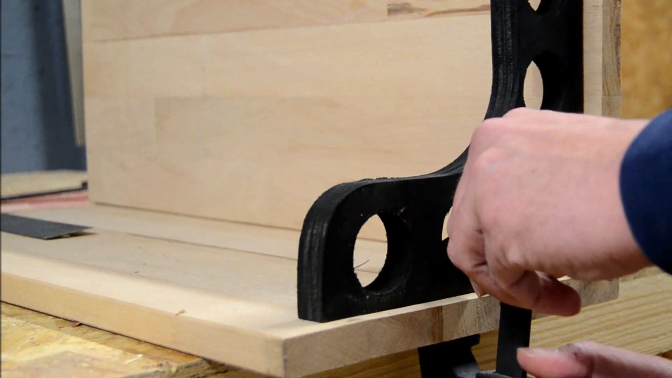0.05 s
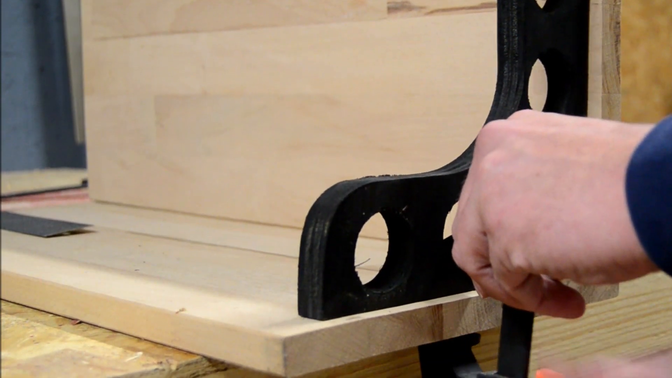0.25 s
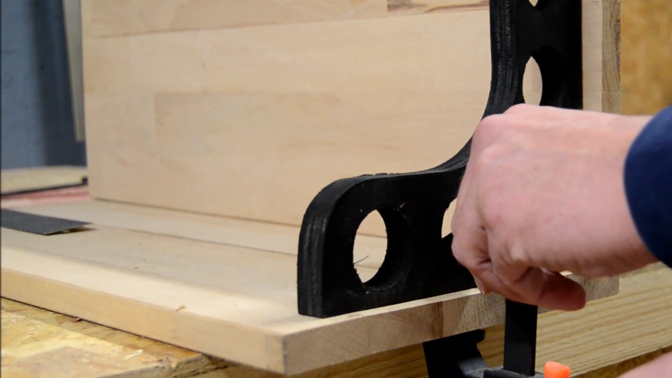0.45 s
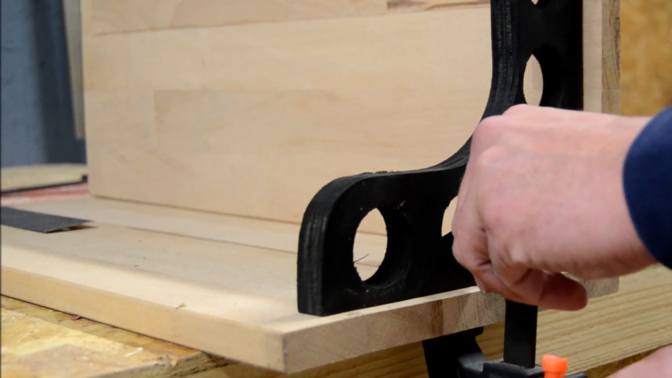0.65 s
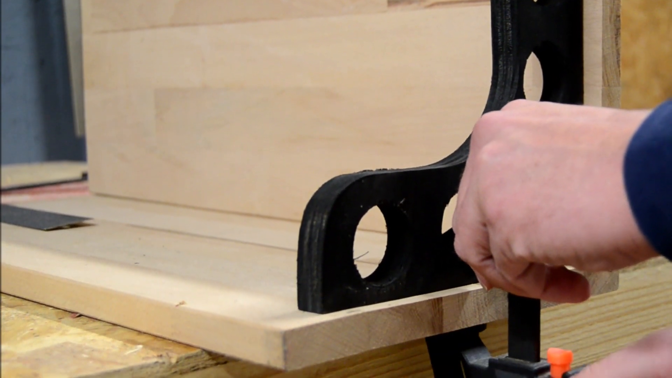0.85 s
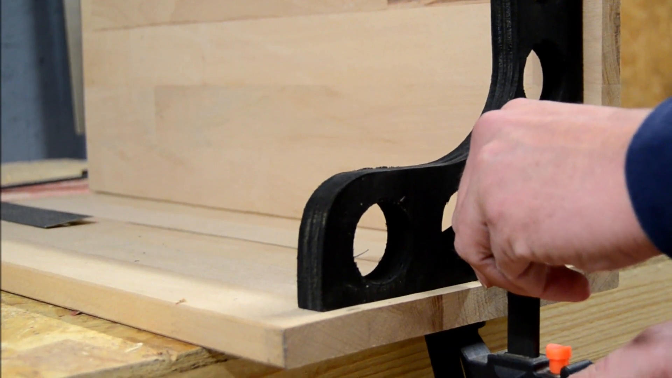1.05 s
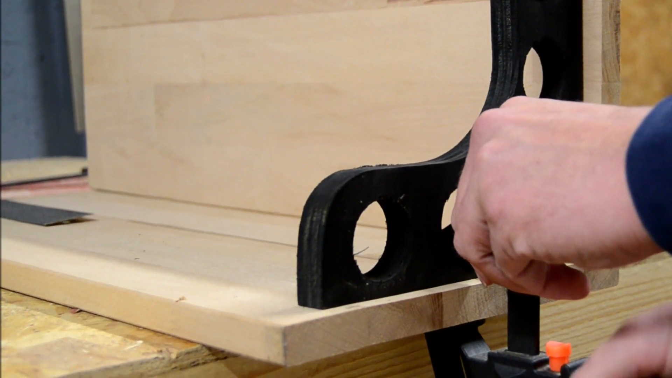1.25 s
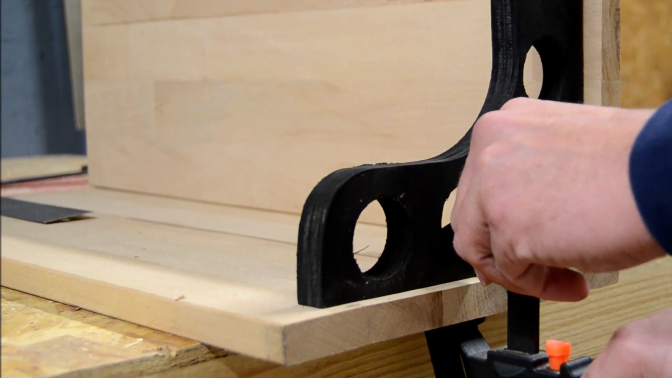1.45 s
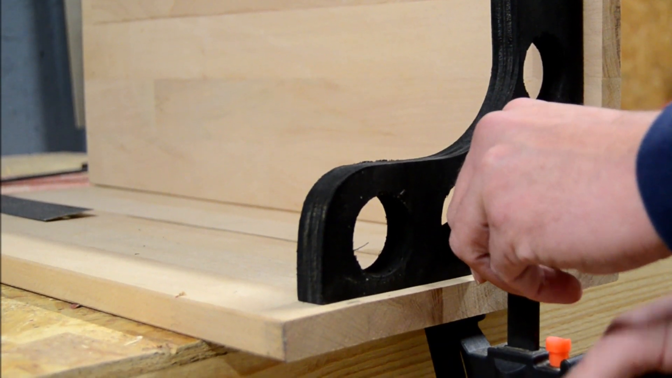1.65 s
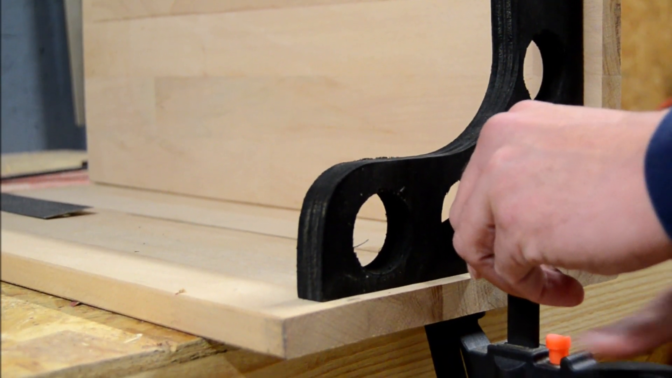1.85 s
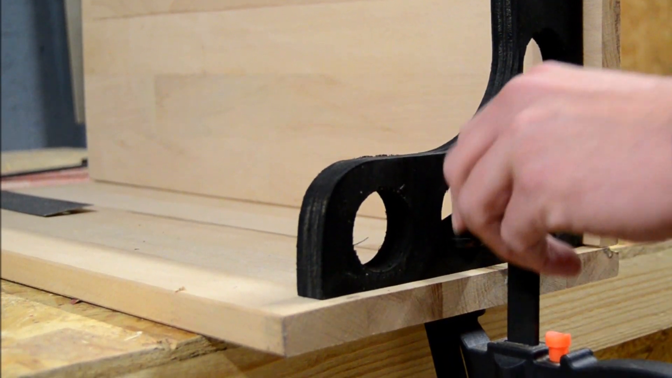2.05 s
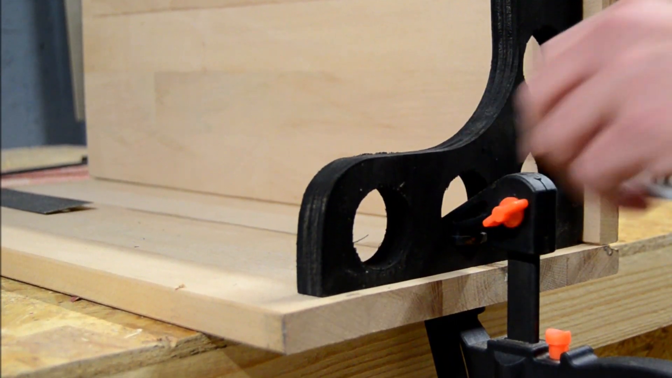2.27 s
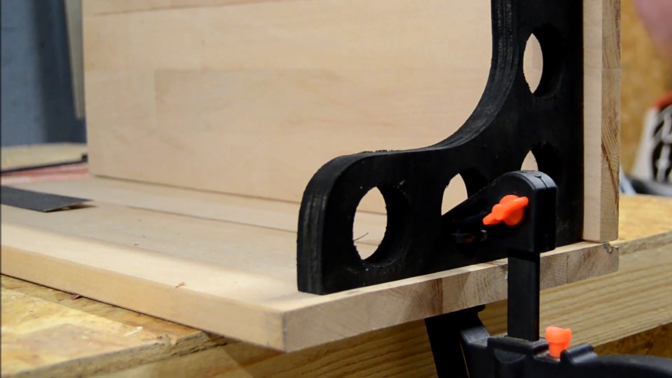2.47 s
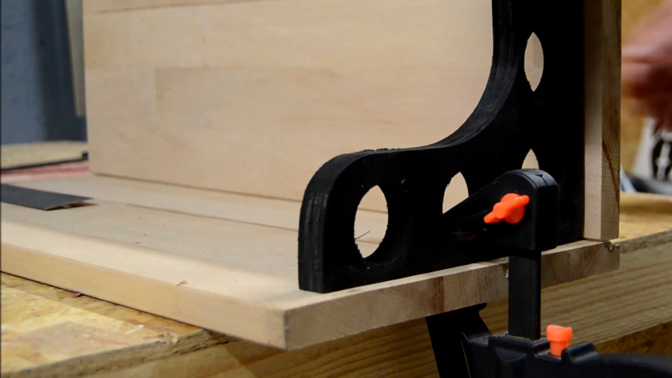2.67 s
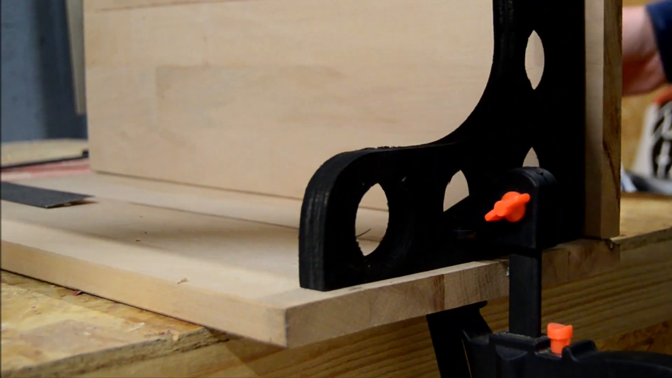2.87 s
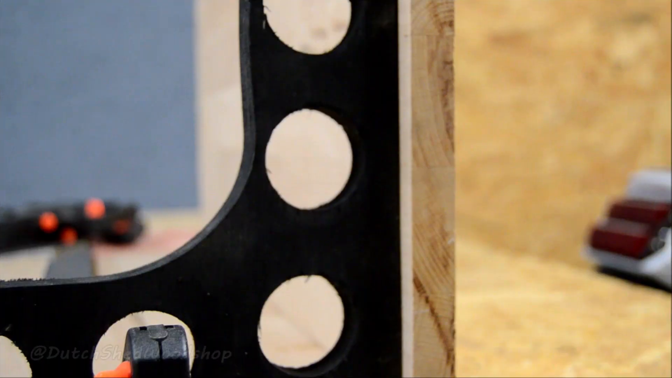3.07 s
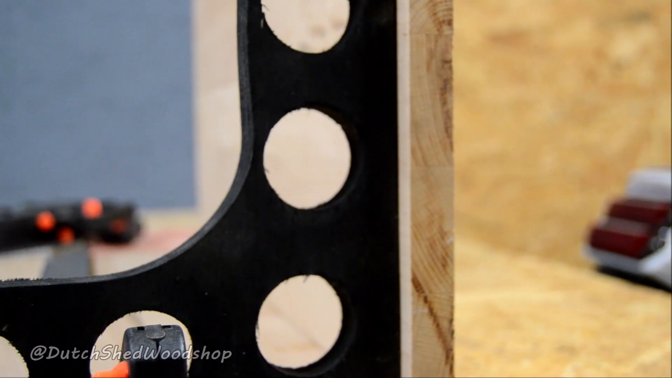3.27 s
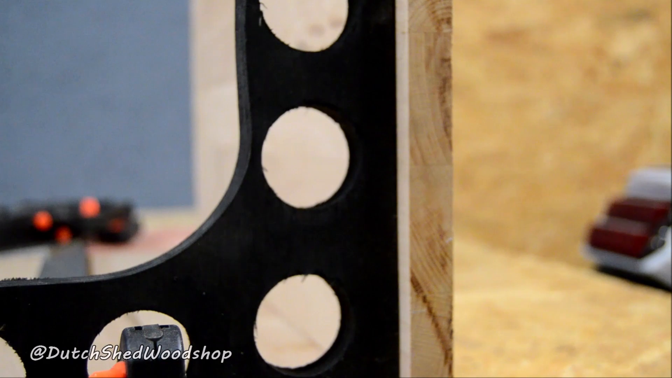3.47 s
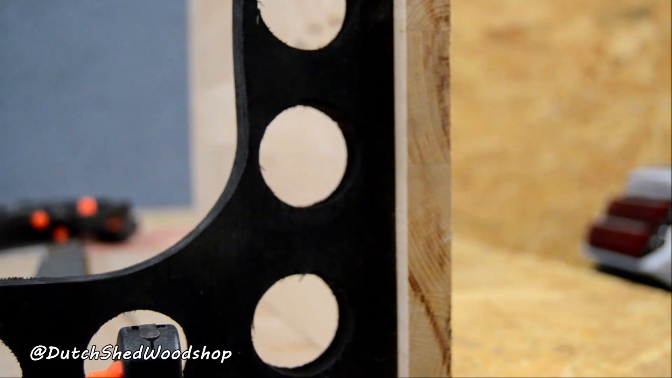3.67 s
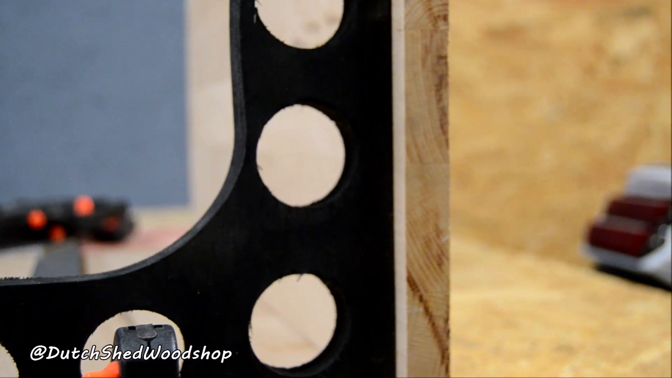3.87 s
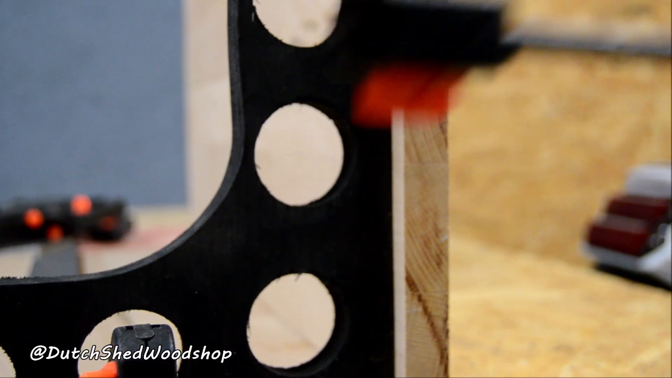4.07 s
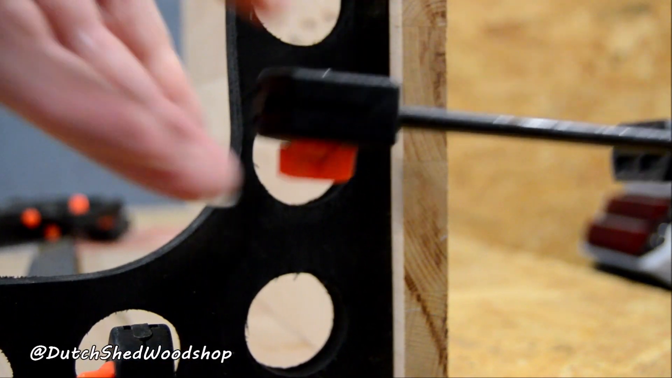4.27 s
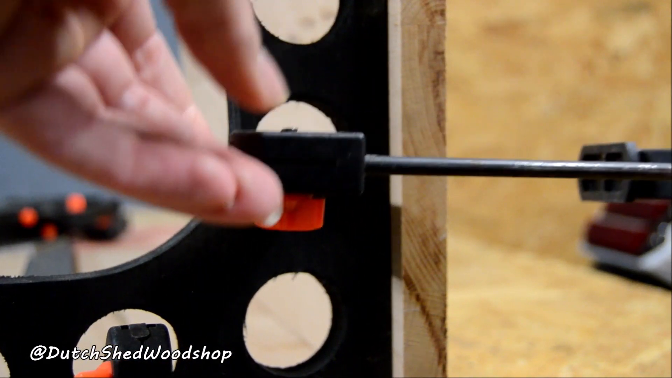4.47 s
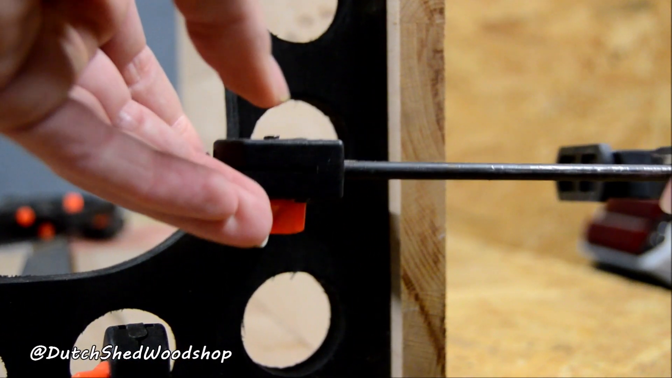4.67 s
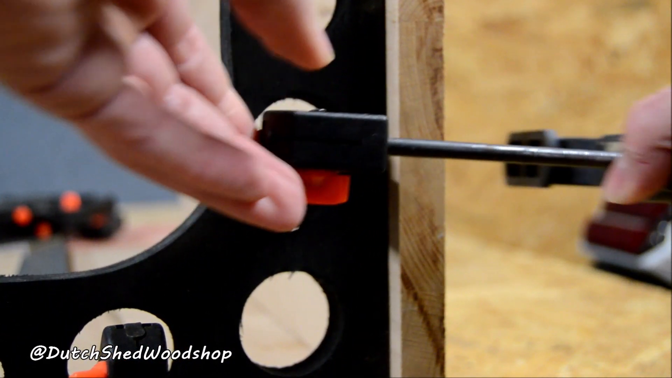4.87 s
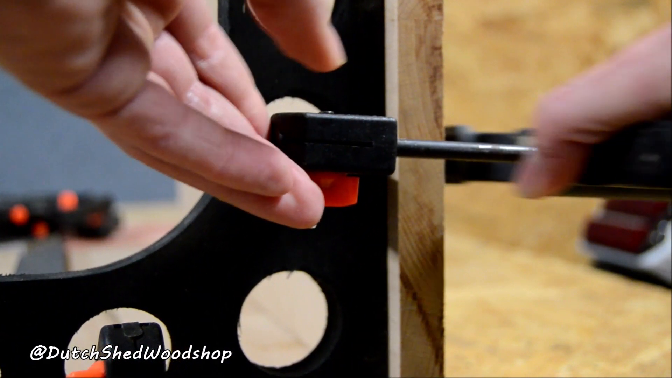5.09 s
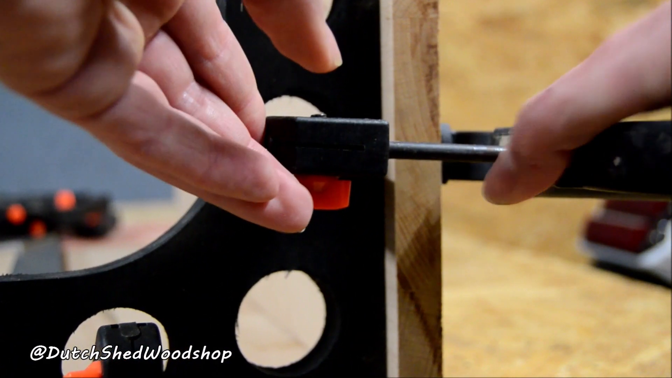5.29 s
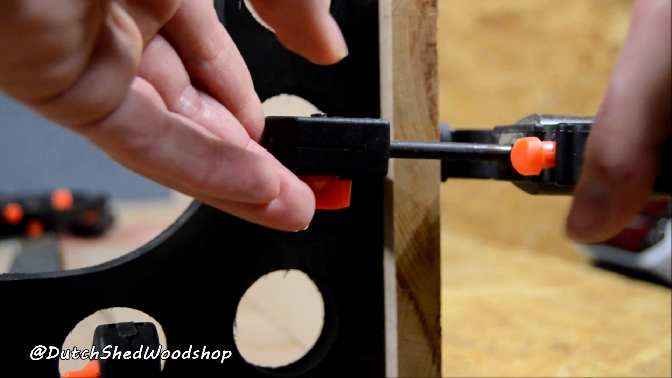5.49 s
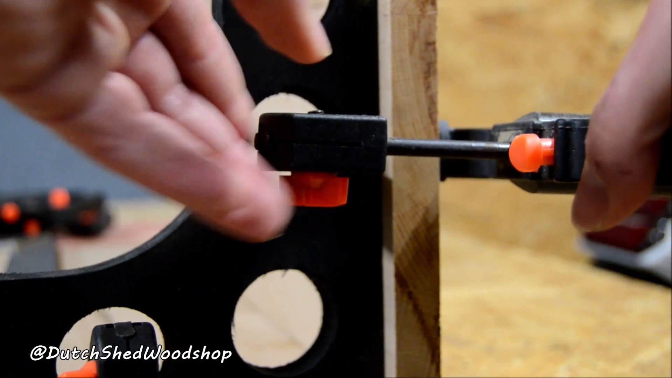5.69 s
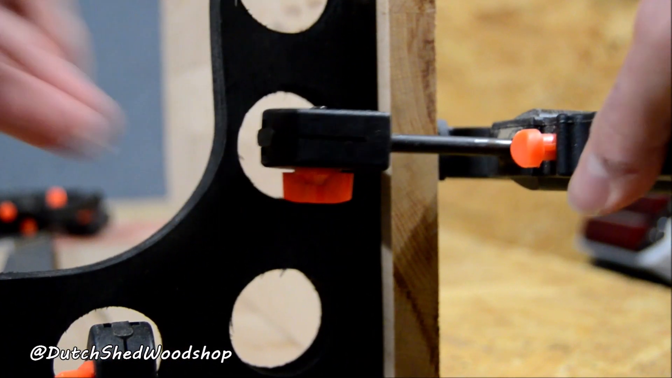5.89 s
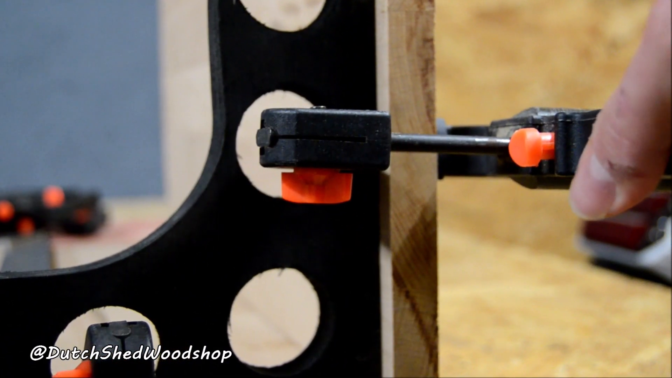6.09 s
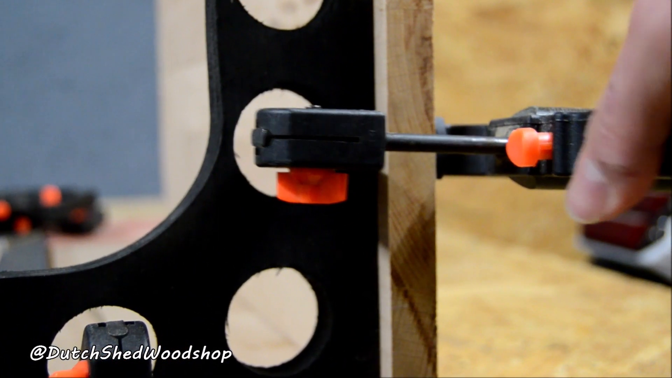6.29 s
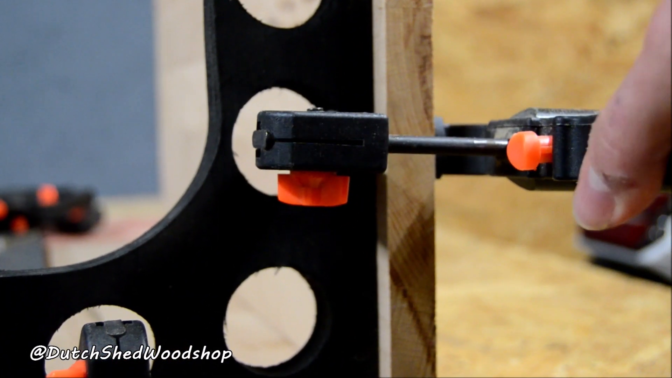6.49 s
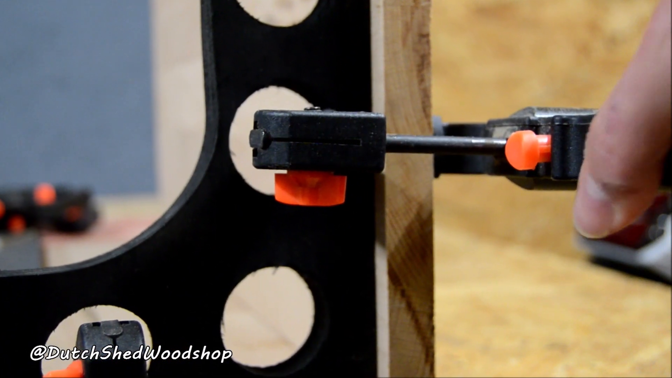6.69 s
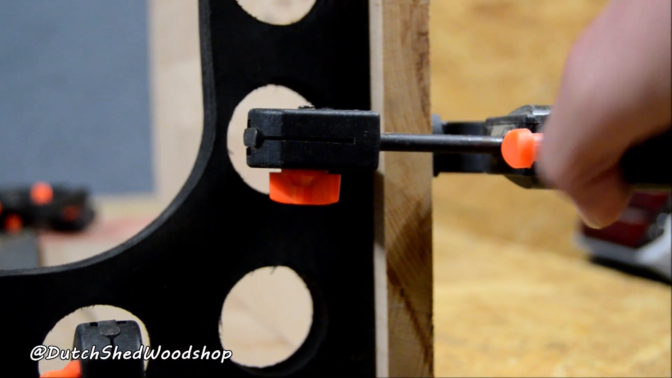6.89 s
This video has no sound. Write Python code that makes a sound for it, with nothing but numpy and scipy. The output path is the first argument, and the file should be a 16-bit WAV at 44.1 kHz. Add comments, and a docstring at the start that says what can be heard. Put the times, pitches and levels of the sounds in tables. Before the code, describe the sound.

Trigger clamps click and knock woodenly on boards in a small workshop; a clamp bar slides open with a rasp, then scrapes shut and tightens.

```python
"""Bar clamps in a small workshop

Two one-handed bar clamps fix a plastic square to a wooden jig, over faint air noise and hum.
Each squeeze or release of a trigger is a noise burst that knocks through the boards and rings on in the room.
Light ticks of the catch, spring pings and soft bench bumps go with the knocks; hands brush the jig.
The second clamp's bar slides open, then shut against the fence: random slips ring jaw and bar and hiss,
scrape, rumble and at moments groan."""
import sys
import numpy as np
from scipy import signal
from scipy.fft import rfft, irfft, next_fast_len
from scipy.io import wavfile
from scipy.ndimage import map_coordinates

SR = 44100
rng = np.random.default_rng(int(sys.argv[2]) if len(sys.argv) > 2 else 0)


def pcm_store(signal):
    """Save signal as 16-bit PCM."""
    levels = np.round(np.clip(np.atleast_2d(signal), -1, 1) * 32767)
    wavfile.write(sys.argv[1], SR, levels.astype(np.int16).T)


N = 306054
RING = 2 ** 15  # samples in one contact or impulse response
T = np.arange(RING) / SR
CLOCK = np.arange(N) / SR

# still workshop air: (frequency [Hz], relative density [dB/Hz])
AIR_COLOUR = [(20, -10), (30, -19), (48, -2.5), (100, -12.5), (150, -8), (300, -10), (450, -10),
              (1000, -12), (1900, -14.5), (3100, -23.5), (4000, -28), (5800, -35), (10000, -38.5),
              (15500, -42)]
# faint hum and whine: (frequency [Hz], level before the common trim [dB])
HUM_TONES = [(96.9, -81.5), (344.5, -86.5), (441.4, -91), (2536, -101)]
# room decay: (frequency [Hz], t60 [s])
ROOM_T60 = [(100, 0.63), (260, 0.37), (700, 0.45), (1800, 0.36), (4800, 0.33), (12000, 0.17)]
# skin on plastic and wood: (frequency [Hz], relative density [dB/Hz])
SKIN_COLOUR = [(200, -16.5), (900, 3.5), (1700, 4.5), (3000, -5), (6000, -20), (13000, -23.5), (16000, -45)]
# hand brushes: (loudest moment [s], level [dB], time to die 60 dB [s])
HAND_BRUSHES = [(2.15, -64.5, 0.32), (2.55, -69, 0.75), (2.781, -66, 1.18), (3.11, -73, 0.38),
                (3.655, -71.5, 0.15)]
# soft bumps against the bench: (time [s], level before attack and decay [dB], pitch [Hz])
BENCH_BUMPS = [(0.589, -37.5, 216.4), (1.17, -53, 123), (1.337, -39.5, 194), (1.403, -47, 127),
               (2.57, -43.5, 185), (2.652, -52.5, 224), (3.554, -43.5, 139), (5.146, -33, 179),
               (5.292, -39, 167), (5.888, -39, 182), (6.339, -42, 106)]
# trigger spring: (time [s], level before attack and decay [dB], pitch [Hz])
SPRING_PINGS = [(0.777, -68, 4750), (0.927, -63, 4600)]
# taps of the catch: (time [s], jaw peak [dB], steel edge peak re jaw peak [dB])
CATCH_TICKS = [(0.506, -57.5, 2), (0.786, -51, -16), (1.181, -53, -4), (1.334, -44.5, 8.5),
               (1.475, -58.5, 2), (1.661, -40.5, -1.5), (2.540, -66, 9), (2.551, -52, -20),
               (3.327, -40, -25), (3.888, -60, -28), (4.562, -55.5, -28), (4.882, -42, -11),
               (5.273, -39.5, -18), (5.371, -38, -27), (5.636, -42.5, -23), (5.834, -42.5, -34),
               (5.910, -36.5, -33), (6.188, -42.5, -10.5), (6.299, -42.5, -24), (6.331, -33, -12.5)]
# broad colour of jaw and bar: (frequency [Hz], relative density [dB/Hz])
STEEL_COLOUR = [(100, -12.5), (300, -17.5), (620, -7.5), (780, -1), (1300, -5), (1900, -1.5), (2450, -13.5),
                (4200, -19), (5200, -27), (10000, -34.5), (15500, -52)]
# plastic jaw, bar pulled out, bar pushed in: (resonance [Hz], width [Hz], lift [dB])
JAW_MODES = [(324, 8, 20.5), (867, 61, 10.5), (942, 64, 4.5), (1230, 440, 5), (1550, 150, 6.5),
             (1830, 40, 3)]
BAR_OUT_MODES = [(3060, 250, 4.5), (3500, 150, 5.5), (4000, 69, 5), (6000, 130, 12.5), (6630, 150, 11),
                 (8260, 270, 10), (10500, 370, 8.3), (12600, 1700, 5.2)]
BAR_IN_MODES = [(3880, 150, 8.9), (4100, 180, 3.1), (6570, 400, 2.5), (8320, 93, 16.4), (10400, 550, 9.6)]
# hiss of the moving bar, standing for its speed: (time [s], level before hiss_db [dB])
OPENING_STROKE = [(3.35, -83), (3.356, -62.5), (3.388, -64), (3.442, -55.5), (3.56, -80.5)]
CLOSING_STROKE = [(4.67, -85), (4.698, -73), (4.798, -68.5), (5.028, -69), (5.07, -66), (5.135, -65.5)]
# rumble, scrape and hiss bands: (low edge [Hz], high edge [Hz])
SLIDE_BANDS_HZ = [(100, 600), (600, 2400), (2400, 15800)]
# jaw binding on the bar: (loudest moment [s], length [s], level [dB], pitch [Hz])
JAW_BINDS = [(3.363, 0.032, -59, 1520), (3.492, .1, -56, 980), (3.653, 0.022, -67, 930),
             (4.894, 0.038, -48.5, 1250), (5.084, .08, -47.5, 864)]
# trigger and jaw contacts: (time [s], blow before growth and colour [dB], hardness [0-1])
CONTACTS = [(0.0, -32.5, 0.25), (0.182, -60.5, 0.44), (0.506, -55, 0.59), (0.581, -39, 0.07),
            (0.775, -40.5, 0.69), (0.784, -50, 0.6), (0.926, -47.5, 0.34), (0.965, -52.5, 0.01),
            (1.13, -61, 0.07), (1.181, -39.5, 0.88), (1.331, -43.5, 0.45), (1.388, -55.5, 0),
            (1.635, -56, 0.77), (1.653, -46, 0.74), (2.144, -68.5, 0.56), (2.549, -65.5, 0.9),
            (2.571, -59.5, 0.46), (4.881, -65.5, 0.8), (4.904, -60, 0), (5.140, -30.5, 0.23),
            (5.287, -52.5, 0), (5.832, -59.5, 0.6), (5.872, -45, 0.32), (5.908, -47.5, 0.18),
            (6.179, -62, 1), (6.187, -58.5, 0.77), (6.296, -56.5, .85), (6.324, -39.3, 0.44),
            (6.746, -62, 0.8), (6.757, -67, 1)]
# base board and upright fence: (frequency [Hz], relative density [dB/Hz])
BASE_COLOUR = [(30, -26.5), (110, -7.5), (160, -5.5), (220, -8), (500, 0.5), (900, 7), (1400, -0.5),
               (2400, -10), (3500, -17.5), (5500, -27.5), (9000, -30.5), (15500, -40.5)]
FENCE_COLOUR = [(30, -16), (110, -18), (175, -3), (300, 2), (480, -1.5), (900, 0.5), (1400, -3.5),
                (2400, -10), (3500, -23.5), (5500, -34.5), (9000, -42), (15500, -52.5)]
# base board and upright fence: (resonance [Hz], width [Hz], lift [dB])
BASE_MODES = [(208.8, 6.7, 13.5), (331.4, 58, 19.5), (386.3, 63, 7), (538, 13, 8), (604.4, 36, 10),
              (725, 5.8, 1), (772, 51, 1.5), (999, 89, -1), (1075, 53, 6.5), (1638, 11, -3),
              (2015, 130, 5.5), (2450, 680, 6), (4740, 350, 7)]
FENCE_MODES = [(193.6, 35, 18.6), (229, 60, 2.2), (289, 30, 5.3), (364, 41, 17.5), (470.5, 15, 9.5),
               (627, 35, 12.6), (765, 21, 18.2), (850, 78, 11.6), (1026, 53, 10.2), (1178, 50, 12.6),
               (1249, 8.3, 9.4), (1714, 29, 8), (2080, 320, 5.1), (3120, 50, 1.8), (4160, 25, 4.4)]
# thud, knock, clack and snap bands: (low edge [Hz], high edge [Hz])
KNOCK_BANDS_HZ = [(30, 280), (280, 1400), (1400, 4000), (4000, 15800)]
# softest and hardest contact: (thud [dB], knock [dB], clack [dB], snap [dB])
SOFT_COLOUR_DB = (-9, 0, -17, -40)
HARD_COLOUR_DB = (-18, -4, 2, -16)
# band gain per dB of blow: (thud [dB/dB], knock [dB/dB], clack [dB/dB], snap [dB/dB])
BAND_GROWTH = (0.68, 1, 0.97, 1)

AIR_DB = -71.5
BRUSH_RISE_S = 0.41  # time to swell by 60 dB
SCRAPE_FOLLOWS = 0.84  # dB of scrape and rumble per dB of hiss
JAW_WANDER, BAR_WANDER, GRIP_CHANGES_PER_S = 0.0428, 0.008, 25  # wander as a share of pitch
SURGE_DB, SURGES_PER_S = 2.6, 60  # jaw catches and lets go
USUAL_BLOW_DB = -45
SOFT_ONSET_S, HARD_ONSET_S = 0.0017, 0.0039  # onset time constant of the softest and hardest contact
CHATTER_GAP_S, CHATTER_STEP_DB = 0.03, -9.5  # mean gap, level step per repeat contact
BENCH_LAG_S = 0.00486  # thud band lags the contact
SECOND_CLAMP_S = 3.0  # contacts ring the base before, the fence after
TOP_HZ = 15700


def amp(db):
    """Decibels to gain."""
    return 10 ** (np.asarray(db) / 20)


def unit(x):
    """Scale to rms 1."""
    return x / np.sqrt(np.mean(x ** 2) + 1e-20)


def fade(t60_s):
    """Exponential decay, 60 dB down after t60_s."""
    return np.exp(-np.log(1000) * T / t60_s)


def attack(rise_s):
    """Exponential approach to full level with time constant rise_s."""
    return 1 - np.exp(-T / rise_s)


def along(points, hz):
    """Read (frequency [Hz], value) points on a log frequency axis."""
    f, v = np.transpose(points)
    return np.interp(np.log(hz + 1), np.log(f + 1), v)


def add(track, s, sound):
    """Mix a sound into the track at time s."""
    start = max(0, round(s * SR))
    track[start:start + len(sound)] += sound[:len(track) - start]


def band(x, edges_hz):
    """Causal band-pass."""
    return signal.sosfilt(signal.butter(3, edges_hz, "bandpass", fs=SR, output="sos"), x)


def through(x, response):
    """Pass x through an impulse response."""
    return signal.fftconvolve(x, response)[:len(x)]


def wobble(knots_per_s):
    """Smooth random curve through normal random knots."""
    return map_coordinates(rng.standard_normal(RING), [CLOCK * knots_per_s])


def body(colour, modes=()):
    """Minimum-phase impulse response: resonances standing on a broad colour."""
    hz = np.fft.rfftfreq(RING, 1 / SR)
    power_lift = 1
    for centre_hz, width_hz, lift_db in modes:
        power_lift = power_lift + (amp(lift_db) ** 2 - 1) / (1 + (2 * (hz - centre_hz) / width_hz) ** 2)
    magnitude = amp(along(colour, hz)) * np.sqrt(np.abs(power_lift))
    # fold the cepstrum onto positive time
    cepstrum = irfft(np.log(magnitude + 1e-6))
    cepstrum[1:RING // 2] *= 2
    cepstrum[RING // 2 + 1:] = 0
    return irfft(np.exp(rfft(cepstrum)))


def room_tail(build_s=0.0006, early_share=0.17, early_s=0.024):
    """Fresh diffuse tail of unit energy: noise decaying per frequency, with an early swell from the near walls."""
    hz, t, z = signal.stft(rng.standard_normal(RING), SR, nperseg=256)
    decay = np.exp(-np.log(1000) * t / along(ROOM_T60, hz)[:, None])
    tail = signal.istft(z * decay, SR)[1][:RING]
    swell = (T / early_s) ** 2 * np.exp(2 - 2 * T / early_s)
    tail = tail * (attack(build_s) + early_share * swell)
    return tail / np.linalg.norm(tail)


def in_room(dry, room_db):
    """Add a room tail to a dry sound."""
    return dry + amp(room_db) * through(dry, room_tail())


def friction(slips_per_s, uneven_db, smooth_share, spread_db=4):
    """Tiny slips of unequal size plus a smooth rub, under a wandering contact pressure."""
    sizes = rng.choice([-1, 1], N) * amp(spread_db * rng.standard_normal(N))
    slips = (rng.random(N) < slips_per_s / SR) * sizes
    rub = unit(slips) + smooth_share * rng.standard_normal(N)
    return rub * amp(uneven_db * wobble(70))


def workshop(hum_trim_db=-2):
    """Steady air: shaped noise plus faint sines."""
    noise = rng.standard_normal(N + RING)
    air = unit(through(noise, body(AIR_COLOUR))[RING:])  # filter onset dropped
    hum = np.zeros(N)
    for hz, rms_db in HUM_TONES:
        hum += amp(rms_db) * np.sqrt(2) * np.sin(2 * np.pi * (hz * CLOCK + rng.random()))
    return amp(AIR_DB) * air + amp(hum_trim_db) * hum


def hands():
    """Fingers brush the jig: skin-coloured friction that swells and dies exponentially."""
    rub = through(friction(slips_per_s=680, uneven_db=1.5, smooth_share=1.3), body(SKIN_COLOUR))
    touch = np.zeros(N)
    for s, db, dying_s in HAND_BRUSHES:
        distance = np.maximum((s - CLOCK) / BRUSH_RISE_S, (CLOCK - s) / dying_s)
        touch += amp(db) * np.exp(-np.log(1000) * distance)
    return touch * unit(rub)


def notes(rows, t60_s, rise_s, room_db):
    """Short decaying sines in the room, one per (time [s], level [dB], pitch [Hz]) row."""
    out = np.zeros(N)
    for s, db, hz in rows:
        note = np.sin(2 * np.pi * hz * T) * fade(t60_s) * attack(rise_s)
        add(out, s, amp(db) * in_room(note, room_db))
    return out


def bumps():
    """A soft push sets the bench top swinging: a brief low sine."""
    return notes(BENCH_BUMPS, t60_s=0.051, rise_s=0.0022, room_db=-6)


def pings():
    """The trigger's steel spring rings briefly: one high sine."""
    return notes(SPRING_PINGS, t60_s=0.051, rise_s=0.001, room_db=-3)


def ticks(jaw_band_hz=(600, 2300), edge_band_hz=(3500, 15000), room_db=-4):
    """The catch taps the jaw: a short impulse through the jaw body, with a steel edge."""
    out = np.zeros(N)
    jaw = band(band(body(STEEL_COLOUR, JAW_MODES), jaw_band_hz), jaw_band_hz)  # twice: steeper
    edge = band(body(STEEL_COLOUR), edge_band_hz)
    jaw = jaw / np.abs(jaw).max()
    edge = edge / np.abs(edge).max()
    for s, peak_db, edge_db in CATCH_TICKS:
        tick = jaw + amp(edge_db) * edge
        add(out, s, amp(peak_db) * in_room(tick, room_db))
    return out


def binds(width_share=0.12, room_db=-6):
    """The jaw binds on the bar and groans: slips crowd into one resonance that swells and fades."""
    out = np.zeros(N)
    for s, length_s, db, hz in JAW_BINDS:
        slips = friction(slips_per_s=500, uneven_db=6.0, smooth_share=0.37)
        resonance = signal.iirpeak(hz, 1 / width_share, fs=SR)
        groan = signal.lfilter(*resonance, band(slips, (600, 2400)))
        swell = np.cos(np.pi * np.clip((CLOCK - s) / length_s, -0.5, 0.5))
        out += amp(db) * unit(groan) * swell
    return in_room(out, room_db)


def stroke_gain(stroke, edge_s=0.021, silent_db=-180):
    """Gain along the stroke's dB points, easing into silence outside them."""
    s, db = np.transpose(stroke)
    times = np.r_[s[0] - edge_s, s, s[-1] + edge_s]
    return amp(np.interp(CLOCK, times, np.r_[silent_db, db, silent_db]))


def wander(x, share):
    """Shift the pitch of x by a smooth random share, as the grip changes."""
    read_rate = 1 + share * wobble(GRIP_CHANGES_PER_S)
    return map_coordinates(x, [np.cumsum(read_rate)], mode="wrap")


def slide(stroke, bar_modes, hiss_db, scrape_db, rumble_db, press_db_per_s, room_db):
    """Slips ring bar and jaw: speed sets the hiss, speed and pressure the scrape and rumble."""
    rub = friction(slips_per_s=1300, uneven_db=1.5, smooth_share=1.0)
    rub = through(rub, body(STEEL_COLOUR, JAW_MODES + bar_modes))
    rumble, scrape, hiss = (unit(band(rub, edges_hz)) for edges_hz in SLIDE_BANDS_HZ)
    scrape = wander(scrape, JAW_WANDER)
    hiss = wander(hiss, BAR_WANDER)
    speed = stroke_gain(stroke)
    start_s, stop_s = stroke[0][0], stroke[-1][0]
    press_db = press_db_per_s * (np.clip(CLOCK, start_s, stop_s) - stop_s)  # 0 dB at the end
    press_db = press_db + SURGE_DB * wobble(SURGES_PER_S)
    drag = (speed / speed.max()) ** SCRAPE_FOLLOWS * amp(press_db)
    dry = amp(hiss_db) * speed * hiss + drag * (amp(scrape_db) * scrape + amp(rumble_db) * rumble)
    return in_room(dry, room_db)


def slides():
    """The second clamp is pulled open with an easing grip, then pushed shut ever harder."""
    opening = slide(OPENING_STROKE, BAR_OUT_MODES, hiss_db=0.5, scrape_db=-55.5, rumble_db=-73.5,
                    press_db_per_s=-19, room_db=-8.5)
    closing = slide(CLOSING_STROKE, BAR_IN_MODES, hiss_db=0.0, scrape_db=-49, rumble_db=-55.5,
                    press_db_per_s=30, room_db=-5.0)
    return opening + closing


def ringing(colour, modes, t60_s=0.34, scatter_db=2):
    """The board's modes sing on as decaying sines, at new strengths for every blow."""
    hz, width_hz, lift_db = np.transpose(modes)
    level_db = along(colour, hz) + lift_db + scatter_db * rng.standard_normal(len(hz))
    size = amp(level_db) / np.sqrt(np.abs(width_hz))
    cycles = hz[:, None] * T + rng.random((len(hz), 1))
    return size @ np.sin(2 * np.pi * cycles) * fade(t60_s)


def chattering_crack(onset, t60_s=0.019):
    """A noise burst, then two weaker repeat contacts as the jaw settles."""
    crack = onset * rng.standard_normal(RING) * fade(t60_s)
    delays_s = np.cumsum(CHATTER_GAP_S * (0.5 + rng.random(2)))
    for k, delay_s in enumerate(delays_s, 1):
        repeat = onset * rng.standard_normal(RING) * fade(t60_s)
        add(crack, delay_s, amp(k * CHATTER_STEP_DB) * repeat)
    return crack


def knocks(ring_db=-4, direct_db=(-13, -10, -7, -1)):
    """Each contact cracks, chatters, rings the board under the clamp and fills the room."""
    out = np.zeros(N)
    lags_s = (BENCH_LAG_S, 0, 0, 0)  # the heavy bench answers later
    for s, blow_db, hardness in CONTACTS:
        # hard contacts are brighter; here their onset also swells in more slowly
        colour_db = (1 - hardness) * np.array(SOFT_COLOUR_DB) + hardness * np.array(HARD_COLOUR_DB)
        band_db = USUAL_BLOW_DB + np.array(BAND_GROWTH) * (blow_db - USUAL_BLOW_DB) + colour_db
        onset = attack(SOFT_ONSET_S * (HARD_ONSET_S / SOFT_ONSET_S) ** hardness)
        wood = (BASE_COLOUR, BASE_MODES) if s < SECOND_CLAMP_S else (FENCE_COLOUR, FENCE_MODES)
        board = body(*wood)
        direct = unit(through(chattering_crack(onset), board))
        room = unit(through(onset * room_tail(), board))
        sustain = room + amp(ring_db) * unit(onset * ringing(*wood))
        for edges_hz, db, near_db, lag_s in zip(KNOCK_BANDS_HZ, band_db, direct_db, lags_s):
            part = band(amp(near_db) * direct + sustain, edges_hz)
            early_rms = np.std(part[:RING // 24])  # first 31 ms
            add(out, s + lag_s, amp(db) * part / early_rms)
    return out


def scene():
    """Sum of all sources, as one channel."""
    background = workshop() + hands()
    clamps = bumps() + pings() + ticks() + binds() + slides() + knocks()
    return (background + clamps)[None]


def record(dry):
    """Remove everything from TOP_HZ up."""
    size = next_fast_len(N + RING)
    keep = np.fft.rfftfreq(size, 1 / SR) < TOP_HZ
    return irfft(rfft(dry, size) * keep, size)[:, :N]


dry = scene()
out = record(dry)
pcm_store(out)
```